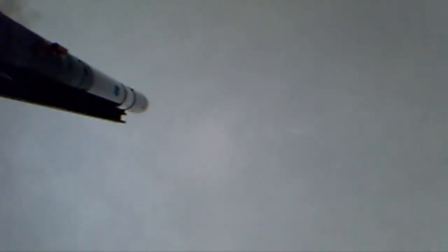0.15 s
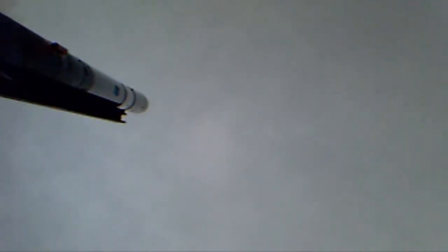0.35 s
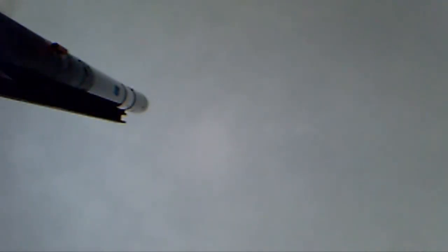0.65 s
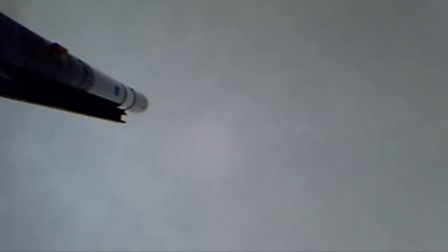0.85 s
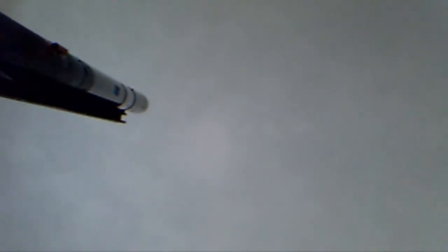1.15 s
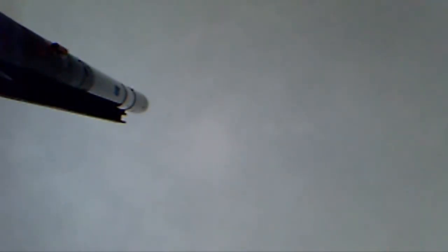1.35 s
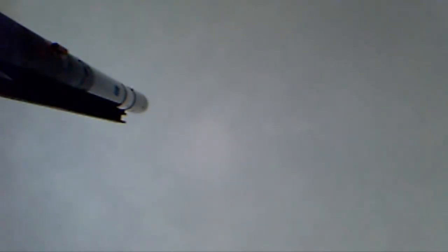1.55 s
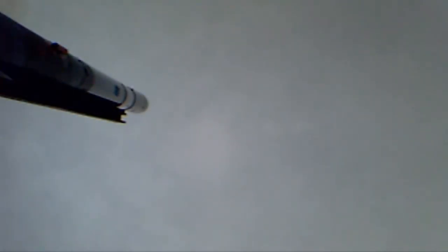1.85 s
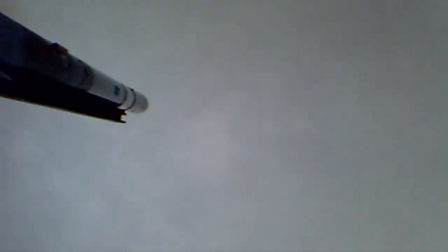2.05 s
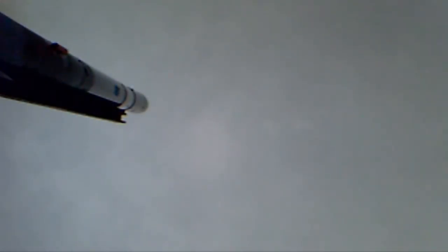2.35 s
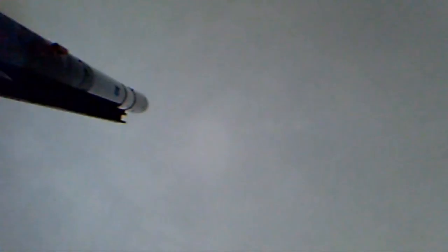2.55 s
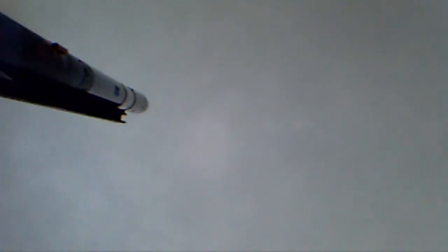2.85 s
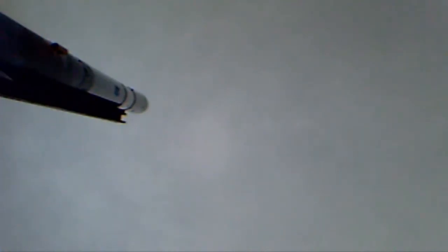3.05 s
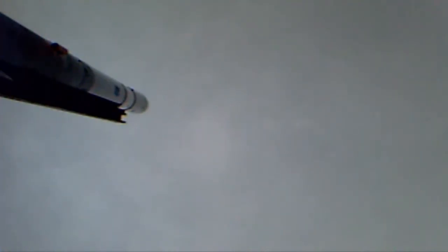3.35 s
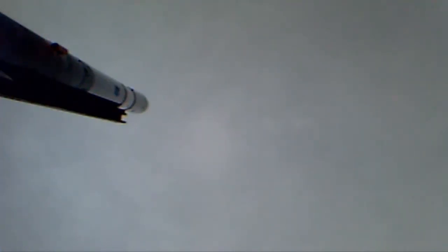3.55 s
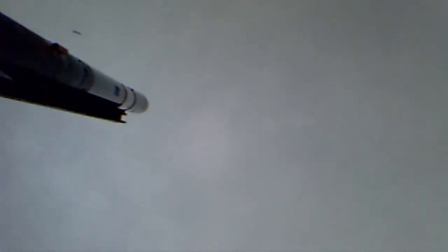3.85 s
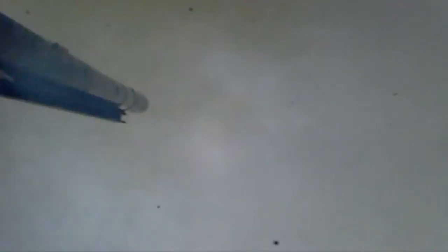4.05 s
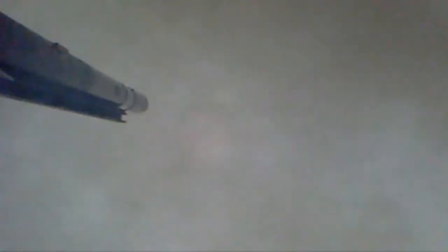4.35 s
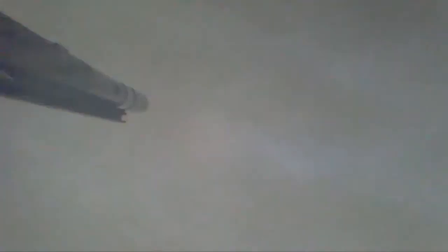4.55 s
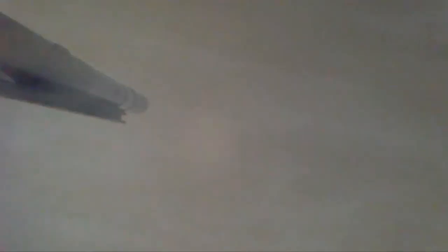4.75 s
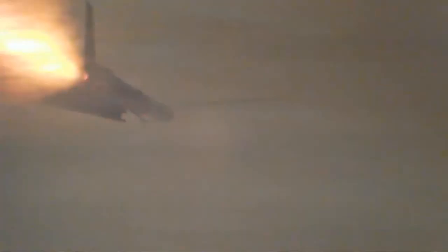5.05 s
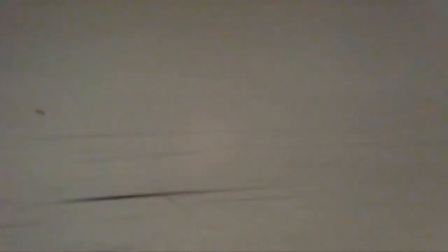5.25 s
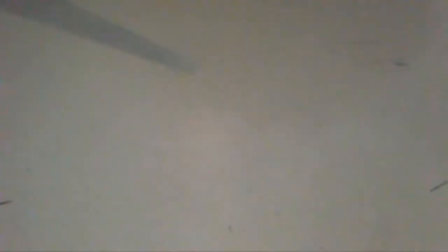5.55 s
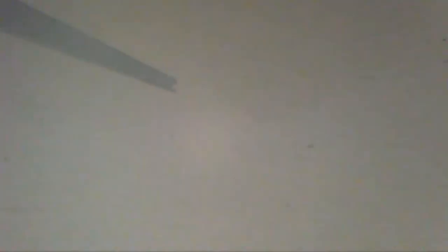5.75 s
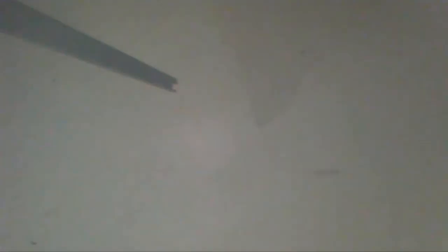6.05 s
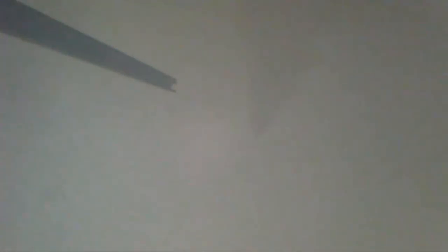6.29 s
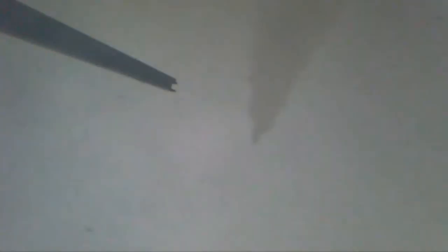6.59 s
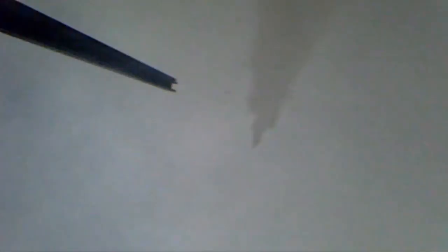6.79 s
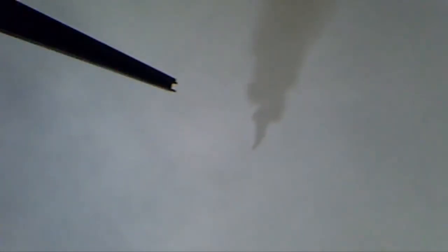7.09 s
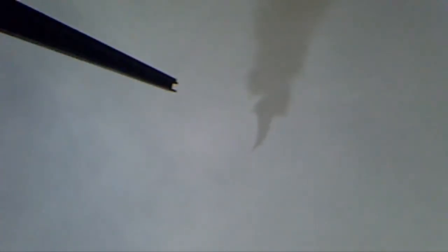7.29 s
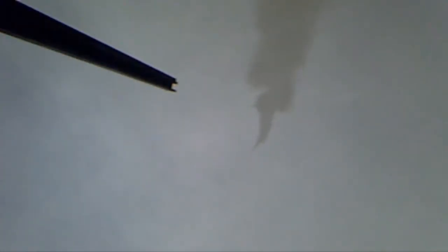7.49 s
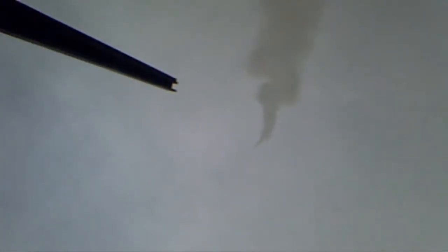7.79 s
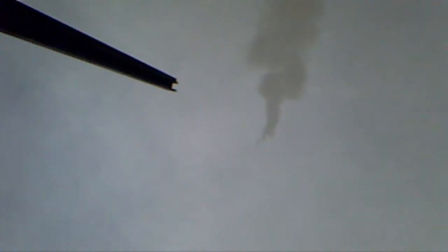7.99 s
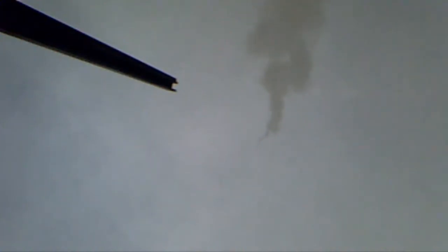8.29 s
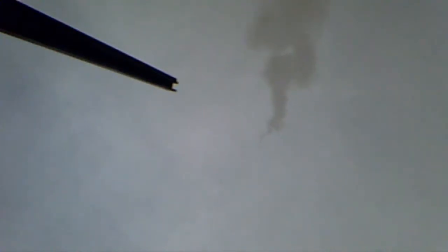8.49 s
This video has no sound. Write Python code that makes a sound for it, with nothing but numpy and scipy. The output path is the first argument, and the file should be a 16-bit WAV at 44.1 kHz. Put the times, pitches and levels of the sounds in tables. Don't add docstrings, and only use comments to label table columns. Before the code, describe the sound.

Steady gas rush over a close microphone, then a rocket motor ignites in a harsh choking blast, departs, and fades to distant crackling rumble.

```python
import sys
import numpy as np
from scipy import signal
from scipy.fft import rfft, irfft
from scipy.io import wavfile
from scipy.ndimage import uniform_filter1d

SR = 44100
rng = np.random.default_rng(int(sys.argv[2]) if len(sys.argv) > 2 else 0)


def invert_db(x):
    u = np.asarray(x, float) / 20
    return 10 ** u


def int16_out(signal):
    q = np.round(np.clip(np.atleast_2d(signal).T, -1, 1) * 32767)
    wavfile.write(sys.argv[1], SR, q.astype(np.int16))


N = 380532
T = np.arange(N) / SR
HZ = np.fft.rfftfreq(N, 1 / SR)

# (shuts [s], snaps open [s], depth [dB], leak won back [dB], extra treble loss [dB])
CHOKES = [
    (3.683, 3.797, 30, 17.5, 1.5),
    (3.821, 3.915, 32, 11, 3.5),
    (3.99, 4.113, 41.5, 7.5, 9),
    (4.095, 4.209, 15, -1, 22),
]


def evened(x):
    return x / np.sqrt(np.mean(x ** 2) + 1e-20)


def read(points, hz):
    f, value = np.transpose(points)
    return np.interp(np.log(hz + 1), np.log(f + 1), value)


def add(mix, s, sound):
    part = mix[round(s * SR):][:len(sound)]
    part += sound[:len(part)]


def ramp(s, length):
    return np.clip((T - s) / length, 0, 1)


def bumps(rows):
    return sum(db * np.exp(-(2 * (T - at) / length) ** 2) for at, db, length in rows)


def gusts(rate):
    return evened(irfft(rfft(rng.standard_normal(N)) / (1 + (HZ / rate) ** 2), N))


def coloured(points):
    return evened(irfft(rfft(rng.standard_normal(N)) * invert_db(read(points, HZ)), N))


def electronics():
    # (frequency [Hz], level [dB])
    whine = [(5599, -84), (5798, -91), (6702, -86), (7402, -86), (9598, -94)]
    # (frequency [Hz], density [dB])
    hiss = [(880, -33), (1500, -1), (1820, -6), (2350, -13.5), (3630, -17.5), (4470, -21), (7620, -22),
            (11000, -27.5), (14300, -58.5), (22000, -120)]
    # (frequency [Hz], density [dB])
    field = [(20, -16), (45, 3), (90, 1.5), (140, -2), (250, -32.5), (450, -2.5), (700, -14.5),
             (1200, -48.5)]
    hiss_db, field_db = -63.5, -59
    rise_db, rise_s = 7.5, 0.41
    lines = np.zeros(N)
    for hz, db in whine:
        level = invert_db(db + 6 + 1.2 * gusts(9.0))
        lines += level * np.sin(2 * np.pi * hz * T + .3 * gusts(15.0))
    hiss_level = invert_db(hiss_db + rise_db * np.exp((T - T[-1]) / rise_s))
    return hiss_level * coloured(hiss) + invert_db(field_db) * coloured(field) + lines


def grit():
    # (time [s], peak level [dB], pitch [Hz])
    ticks = [
        (5.2056, -56, 4940),
        (5.9619, -36, 4700),
        (6.0237, -54, 8000),
        (6.0601, -60, 5610),
    ]
    out, t = np.zeros(N), np.arange(300) / SR
    for s, db, hz in ticks:
        click = .2 * np.sin(2 * np.pi * hz * t) + rng.standard_normal(300)
        add(out, s, invert_db(db) * click * np.exp(-t / .0012))
    return signal.sosfilt(signal.butter(2, [3500, 9500], "bandpass", fs=SR, output="sos"), out)


def choke_db():
    shut_s, snap_s, leak_bend = 0.025, .004, 1.8
    lag_db, lag_s = 17, .027
    body, treble = np.zeros(N), np.zeros(N)
    for shuts, snaps, depth_db, leak_db, treble_db in CHOKES:
        shut = ramp(shuts, shut_s) * (1 - ramp(snaps, snap_s))
        leak = ramp(shuts, snaps - shuts) ** leak_bend
        body = np.maximum(body, shut * (depth_db - leak_db * leak))
        reopened = ramp(snaps - snap_s / 2, snap_s)
        lag = lag_db * reopened * (1 - ramp(snaps, lag_s) ** leak_bend)
        treble = treble + shut * treble_db * (1 - leak) + lag
    return [0.74 * body, 0.65 * body, body, body + treble]


def howl(rows):
    s, hz, db, width = np.transpose(rows)
    pole = np.exp(-np.pi * width.mean() / SR)
    white = rng.standard_normal(N) + 1j * rng.standard_normal(N)
    slow = signal.lfilter([1], np.convolve([1, -pole], [1, -pole]), white)
    phase = 2 * np.pi * np.cumsum(np.interp(T, s, hz)) / SR
    tone = evened((slow * np.exp(1j * phase)).real)
    fade = np.clip(np.minimum(T - s[0], s[-1] - T) / .02, 0, 1)
    return tone * invert_db(np.interp(T, s, db) + 1.4 * gusts(25)) * fade


def turbulence(rows, bands, colour, housing, gust_db, gust_rate, crackle):
    # (time [s], gain [dB], length [s])
    surges = [(.3, 2.5, 0.28), (1.076, 1, .05), (1.7, 1.5, 0.19), (2.59, -0.5, 0.032), (3.1, 4.5, 0.11),
              (2.991, 6.5, 0.052), (3.43, 4.5, 0.081), (3.501, 12.5, 0.036), (3.685, 12, 0.017),
              (3.802, 12.5, 0.015), (3.917, 14.5, 0.028), (4.118, 10, 0.06), (4.241, 6.5, 0.024),
              (4.796, 2, 0.038), (4.886, 4.5, 0.065), (4.96, 9, 0.15), (5.03, 10.5, 0.054), (5.2, 0, .12),
              (5.5, 1, 0.14), (6.2, 0, 0.17), (7.793, 10, .06), (8.47, 1, 0.36)]
    # (time [s], gain [dB], length [s])
    hiss_gusts = [(.09, -3, 0.26), (3.375, 9, 0.047), (3.68, 14, 0.013), (3.82, 8.5, 0.07), (3.952, 3, .03),
                  (4.87, 8.5, 0.089), (5.16, 4, .06), (5.67, 8, 0.3), (6.97, 4, 0.17), (7.23, 8.5, 0.52),
                  (7.79, 16, .12), (8.5, 9, 0.32)]
    # (time [s], drive [dB])
    overload = [(0, 1.2), (2.9, 2.5), (3.3, 4), (3.9, 6), (4.34, 9), (4.67, 9), (4.92, 1.5), (5.05, 0)]
    band_edges_hz = [150, 650, 2200]

    s, level_db, control = np.transpose(rows)
    surge_db = bumps(surges)
    swells = [1.1 * surge_db, surge_db, 0, bumps(hiss_gusts)]
    levels = []
    for (over_db, gain_db, _), swell_db, lost_db in zip(bands, swells, choke_db()):
        course_db = np.interp(T, s, level_db + over_db + gain_db * control)
        levels.append(course_db + swell_db - lost_db)

    strength = invert_db(2.6 * np.minimum(rng.exponential(1, N), 3.5))
    fires = rng.random(N) < 300 / SR
    shocks = strength * fires * rng.choice([-1, 1, 1], N)
    shocks = irfft(rfft(shocks) / (1 + (HZ / 2500) ** 4), N)
    drive = rng.standard_normal(N) + crackle * evened(shocks)

    shape = read(colour, HZ)
    for hz, width, db in housing:
        shape = shape + db / (1 + (2 * (HZ - hz) / width) ** 2)
    z = rfft(drive) * invert_db(shape)
    below = [0] + [1 / (1 + (HZ / edge) ** 12) for edge in band_edges_hz] + [1]
    shared = gust_db * gusts(gust_rate)
    out = np.zeros(N)
    for db, band, lo, hi in zip(levels, bands, below, below[1:]):
        part = evened(irfft(z * (hi - lo), N))
        out += invert_db(db + shared + band[2] * gusts(gust_rate)) * part

    total_db = 10 * np.log10(sum(invert_db(2 * db) for db in levels))
    near_rail = np.clip((total_db + 20) / 5, 0, 1)
    on = np.clip(np.minimum(T - s[0], s[-1] - T) / .012 + 1, 0, 1)
    return out * on * invert_db(np.interp(T, *np.transpose(overload)) * near_rail)


def pops():
    # (time [s], peak level [dB], pitch [Hz], decay [cycles])
    shots = [(3.795, -23, 800, 1.3), (3.913, -13, 900, 3.6), (4.1135, -39, 593, 2.5),
             (4.128, -25, 450, 0.98), (4.1324, -6, 610, 0.5), (6.471, -21.5, 400, 0.71),
             (6.781, -24, 330, 1.4), (6.786, -18, 330, 0.92), (6.807, -27, 700, 2.9),
             (6.812, -21.5, 567, 2.2), (6.853, -11, 308, 0.67), (6.858, -25, 298, 0.6),
             (7.058, -19.5, 810, 1.2), (7.185, -38, 800, 1.8), (7.312, -18, 806, 1.5),
             (7.316, -18, 703, 0.96), (7.343, -26, 700, 1.8), (7.471, -32.5, 400, 0.93),
             (7.508, -36.5, 500, 2), (7.52, -39, 600, 1.6)]
    out = np.zeros(N)
    for s, db, hz, cycles in shots:
        u = np.arange(1500) / SR * hz
        add(out, s, invert_db(db) * 1.8 * np.sin(2 * np.pi * u) * np.exp(-u / cycles * 1.8))
    return signal.sosfilt(signal.butter(3, [130, 1800], "bandpass", fs=SR, output="sos"), out)


def gas_rush():
    # (time [s], level [dB], chamber pressure [0-1])
    course = [(0, -26, 0.21), (.3, -27.5, 0.12), (.84, -24.5, 0.37), (1.2, -26, 0.33), (1.7, -23.5, 0.12),
              (2.09, -23.5, 0.32), (2.17, -29, 0.52), (2.55, -25, 0.51), (2.945, -28, 1)]
    # (over the level [dB], gain as pressure goes 0 to 1 [dB], eddies [dB])
    bands = [
        (4.5, 0.5, 1),
        (-1, 14.5, 0.8),
        (1, -11, 0.7),
        (-12, -4, 1.3),
    ]
    # (frequency [Hz], density [dB])
    colour = [(12, -26), (20, -1), (69, 3.5), (246, -6.5), (528, -8.5), (670, -13.5), (1140, 11.5),
              (2260, -14.5), (2940, -22), (4250, -34), (5840, -35), (11000, -64), (14300, -92),
              (22000, -120)]
    # (centre [Hz], width [Hz], gain [dB])
    housing = [(683, 46, -6), (1190, 440, -16.5), (2220, 660, -22.5), (5850, 260, 9.5), (6400, 210, 6),
               (8080, 350, 11.5)]
    # (time [s], centre [Hz], level [dB], width [Hz])
    port_low = [(0, 988, -27, 200), (.5, 1097, -23.5, 330), (1, 1153, -26, 330), (1.6, 1257, -32.5, 200),
                (2.05, 1240, -46, 200)]
    # (time [s], centre [Hz], level [dB], width [Hz])
    port_high = [(0, 2780, -41, 262), (.5, 2900, -37.5, 400), (1, 2940, -37, 400), (1.7, 3010, -37.5, 262),
                 (2.09, 3080, -49, 262)]
    # (from [s], to [s], depth [dB])
    gap_from, gap_to, gap_db = (2.0965, 2.12, -15)
    out = turbulence(course, bands, colour, housing, gust_db=0.9, gust_rate=6.4, crackle=0.27)
    out = out + howl(port_low) + howl(port_high)
    return out * invert_db(gap_db * ((T > gap_from) & (T < gap_to)))


def ignition():
    # (time [s], level [dB], thrust [0-1])
    course = [
        (2.955, -35, 0.3),
        (3.17, -29.5, 0.9),
        (3.23, -24, 0.24),
        (3.38, -22, 0.62),
        (3.46, -18.5, 1),
    ]
    # (over the level [dB], gain as thrust goes 0 to 1 [dB], eddies [dB])
    bands = [
        (-18.5, 1.5, 3.3),
        (-3, -6, 2.2),
        (1.5, -0.5, 1),
        (-7, 3.5, 0.64),
    ]
    # (frequency [Hz], density [dB])
    colour = [(18, -50), (30, -23), (489, -16), (675, -4), (1450, -7.5), (2260, -21), (2900, -14.5),
              (5110, -20.5), (5930, -9), (7230, -26.5), (7980, -25.5), (11000, -55), (14300, -87.5),
              (22000, -120)]
    # (centre [Hz], width [Hz], gain [dB])
    housing = [(676, 120, -14), (1525, 350, 7.5), (2230, 180, -14), (2810, 370, 7.5), (5900, 310, -3),
               (7270, 300, -7), (7840, 400, 8)]
    return turbulence(course, bands, colour, housing, gust_db=0.64, gust_rate=29, crackle=0.29)


def jet():
    # (time [s], level [dB], dullness [0-1])
    course = [(3.47, -18.5, 0.2), (3.685, -15.5, 0.09), (3.95, -19, 0.08), (4.25, -17, 0.24),
              (4.68, -17.5, 0.3), (4.78, -18.5, 0.94), (4.95, -29, 0.62), (5.05, -38.5, 0.57),
              (5.11, -64, 0.5)]
    # (over the level [dB], gain as dullness goes 0 to 1 [dB], eddies [dB])
    bands = [
        (-22, 13, 1),
        (-14.5, 13.5, 0.97),
        (-2, 3, 1.2),
        (-1, -21, 0.35),
    ]
    # (frequency [Hz], density [dB])
    colour = [(18, -33.5), (30, -10.5), (277, -15.5), (709, -13), (1110, -8.5), (1860, -14), (2260, -15),
              (2970, -17), (4090, -24), (5930, -31), (7980, -35), (11000, -49), (14300, -87), (22000, -120)]
    # (centre [Hz], width [Hz], gain [dB])
    housing = [(1510, 150, 1.5), (2243, 360, -20), (2966, 310, 4), (5900, 810, 9.5), (6800, 230, 6.5),
               (7810, 320, 11.5)]
    # (time [s], centre [Hz], level [dB], width [Hz])
    departure = [(4.55, 1260, -17, 400), (4.68, 1125, -11.5, 400), (4.8, 890, -16, 400),
                 (4.9, 596, -40, 400), (5.0, 412.3, -34, 300), (5.08, 290, -26, 300)]
    blast = turbulence(course, bands, colour, housing, gust_db=1.3, gust_rate=36, crackle=0.24)
    return blast + howl(departure)


def climb():
    # (time [s], level [dB], distance [0-1])
    course = [(5.06, -41.5, 0), (5.17, -36, 0), (5.4, -42, 0.06), (5.66, -36, 0.24), (6.15, -40.5, 0.07),
              (6.56, -37, 0.24), (7.36, -35.5, 0.98), (7.61, -52.5, 1), (8.63, -54.5, 0.85)]
    # (over the level [dB], gain as distance goes 0 to 1 [dB], eddies [dB])
    bands = [
        (-2.5, -30, 1.5),
        (4, -13, 1.7),
        (0.5, -0.5, 1.25),
        (-25.5, -11, 1.1),
    ]
    # (frequency [Hz], density [dB])
    colour = [(18, -45), (30, -7.5), (182, 8), (514, 4.5), (626, -6.5), (802, -10), (1110, -10.5),
              (1560, -17.5), (2210, -31.5), (3440, -35.5), (4300, -56), (7590, -60), (11000, -72),
              (14300, -101), (22000, -120)]
    # (centre [Hz], width [Hz], gain [dB])
    housing = [(664, 60, -10), (1302, 79, -11), (2237, 340, -8.5), (3000, 350, -8.5), (3550, 450, 1.5),
               (4770, 330, 8)]
    # (time [s], centre [Hz], level [dB], width [Hz])
    treble_swells = [(5.5, 5500, -85, 3000), (5.66, 5700, -67, 3000), (5.8, 5240, -89, 3000),
                     (6.9, 3600, -82.5, 1500), (7.15, 4480, -68, 1490), (7.4, 3500, -75, 1490),
                     (7.5, 3500, -87.5, 1500)]
    far_jet = turbulence(course, bands, colour, housing, gust_db=0.45, gust_rate=10.5, crackle=0.16)
    return far_jet + howl(treble_swells)


def scene():
    background = electronics() + grit() + pops()
    rocket = gas_rush() + ignition() + jet() + climb()
    return (background + rocket)[None]


def resting_point():
    # (time [s], offset [full scale])
    drift = [(.7, -.044), (1.9, -.013), (2.3, -.043), (2.85, -.023), (3.68, -.021), (3.75, .004),
             (4.6, -.009), (4.9, .012), (5.3, -.005)]
    sag_depth, sag_fold_s, tremor = .078, .85, .007
    recoil = .0008
    wobble_s, wobble_hz, wobble, wobble_width_s = 5.155, 7.8, .07, .11
    sag = np.exp((T - T[-1]) / sag_fold_s)
    rest = uniform_filter1d(np.interp(T, *np.transpose(drift)), size=600)
    rest = rest - sag * sag_depth + np.sqrt(sag) * tremor * gusts(8)
    since = T - wobble_s
    rest -= wobble * np.cos(2 * np.pi * wobble_hz * since) * np.exp(-(since / wobble_width_s) ** 2)
    t = T[:9000]
    kick = np.exp(-t / .03) * (1 - np.exp(-t / .004))
    for s, _, depth_db, *_ in CHOKES[:-1]:
        add(rest, s + .01, recoil * depth_db * kick)
    return rest


def rails():
    # (time [s], change [full scale])
    steps = [
        (3.9, -.1),
        (3.94, .1),
        (4.348, -.027),
        (4.66, -.022),
    ]
    tired_s, rested_s = 3.9, 5.1
    rail, sink_per_s, free_rail = .305, .11, .9
    upper = rail - sink_per_s * (T - tired_s) + sum(step * ramp(s, .005) for s, step in steps)
    tired = ramp(tired_s - .05, .05) * (1 - ramp(rested_s, .2))
    upper = free_rail + tired * (upper - free_rail)
    return upper, 1.9 * upper - .075


def converter(soft):
    full_scale = .296
    image_slope, edge_hz = 9.4, 14350
    samples = np.pad(np.clip(soft[::2], -full_scale, full_scale), 100, "edge")
    comb = np.zeros(2 * len(samples))
    comb[::2] = 2 * samples
    hz = np.linspace(0, SR / 2, 200)
    gain = 1 / (1 + (4 * hz / SR) ** image_slope) / (1 + (hz / edge_hz) ** 80)
    smooth = signal.firwin2(201, hz, gain, fs=SR)
    return signal.oaconvolve(comb, smooth, "same")[200:200 + N]


def band_limit(x):
    return signal.sosfilt(signal.butter(12, 15550, fs=SR, output="sos"), x)


def record(dry):
    knee = 4.5
    x = dry[0] + resting_point()
    rail = np.where(x > 0, *rails())
    saturated = x / (1 + abs(x / rail) ** knee) ** (1 / knee)
    anti_alias = signal.butter(6, 13500, fs=SR, output="sos")
    soft = signal.sosfiltfilt(anti_alias, saturated)
    return band_limit(converter(soft)[None])


dry = scene()
out = record(dry)
int16_out(out)
```